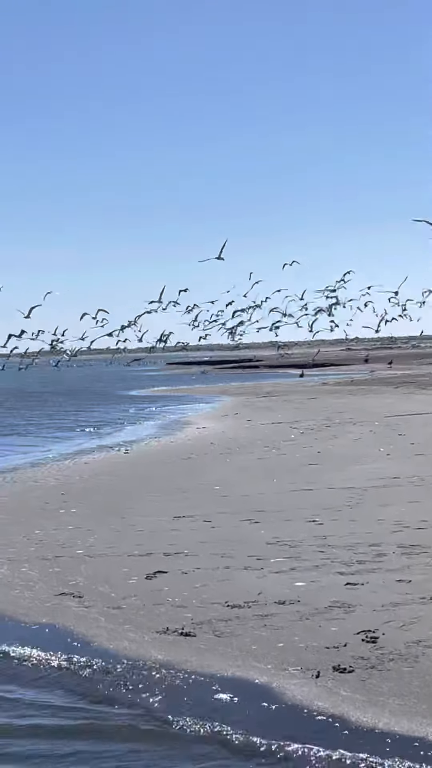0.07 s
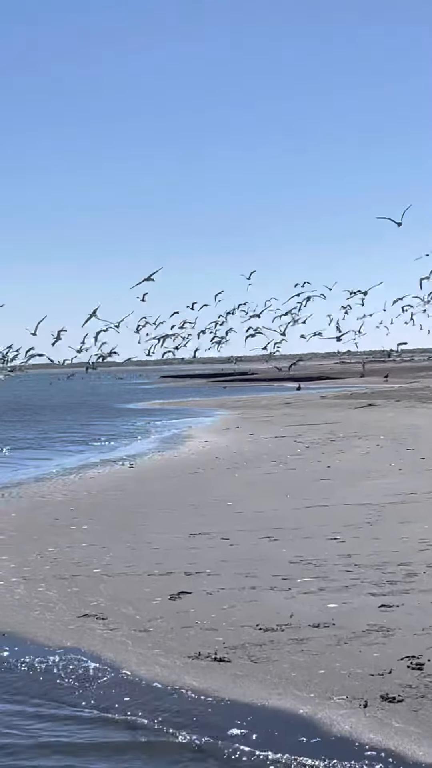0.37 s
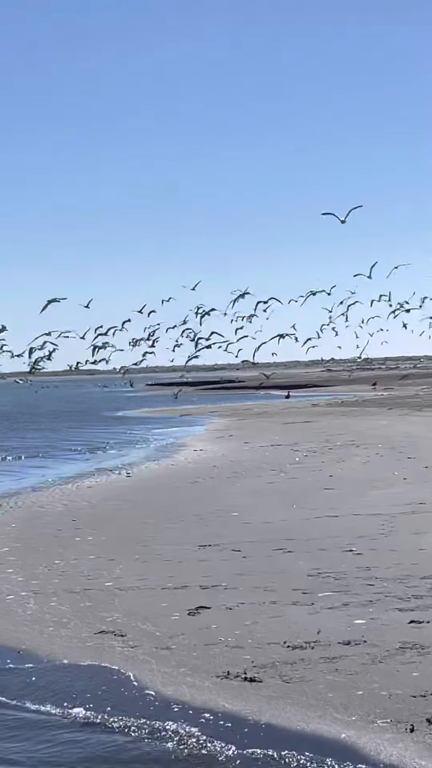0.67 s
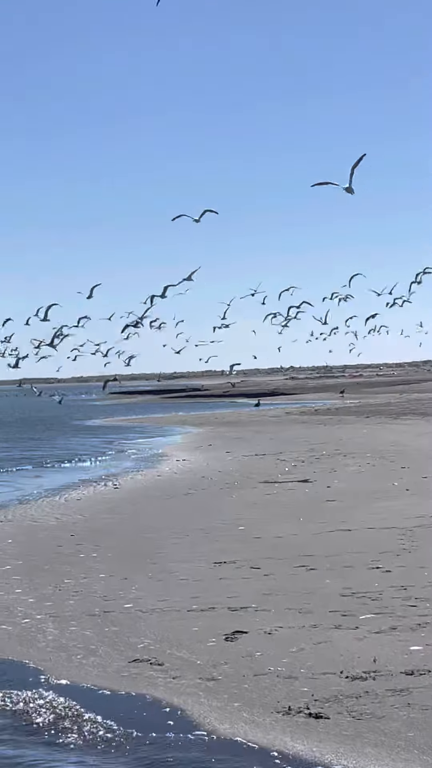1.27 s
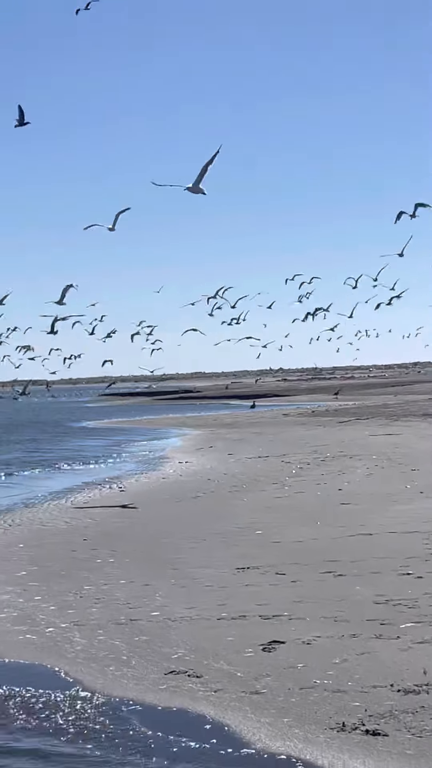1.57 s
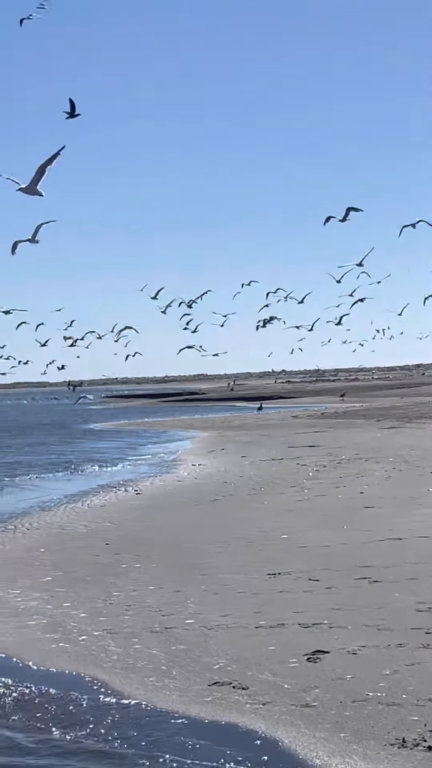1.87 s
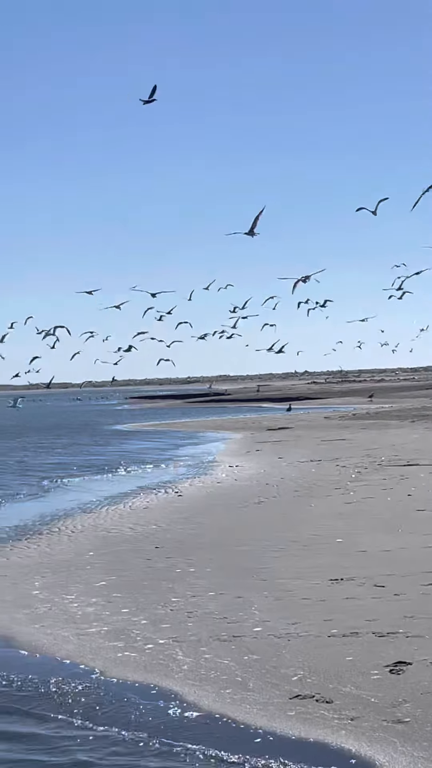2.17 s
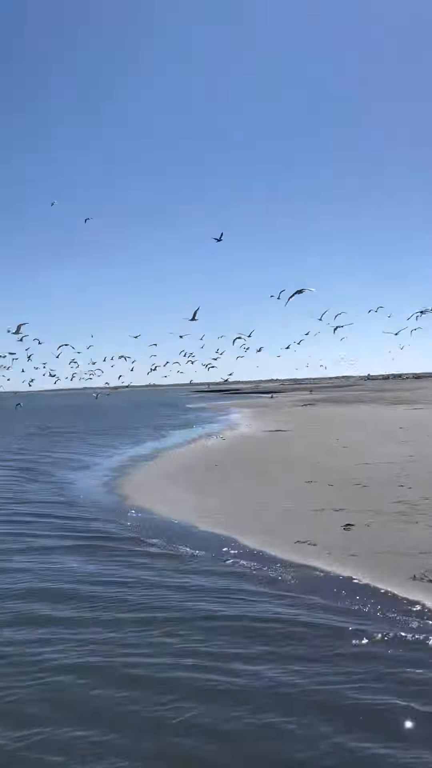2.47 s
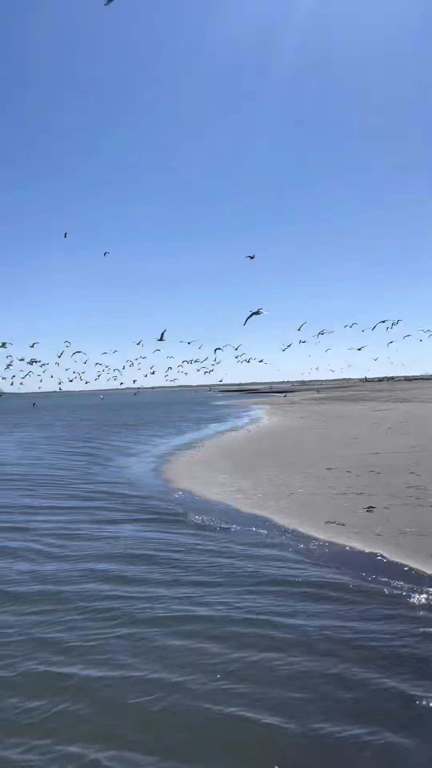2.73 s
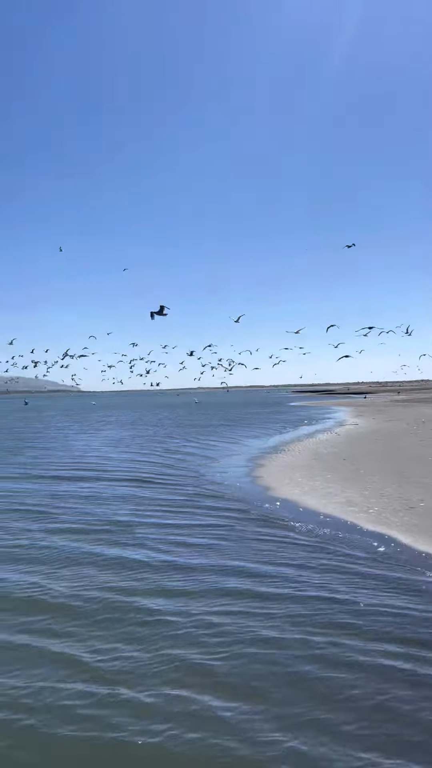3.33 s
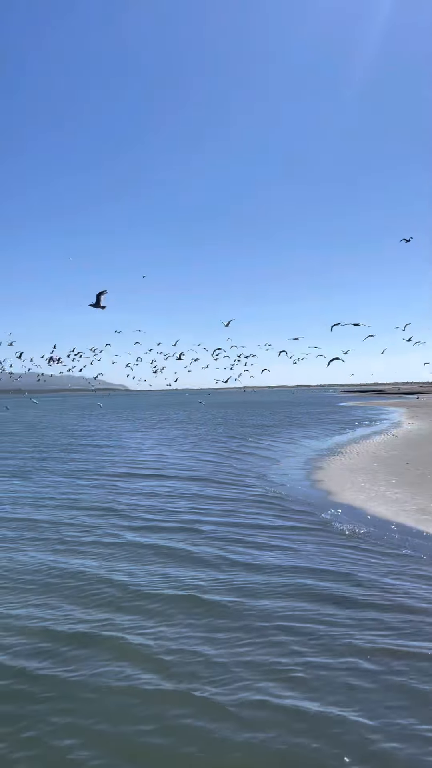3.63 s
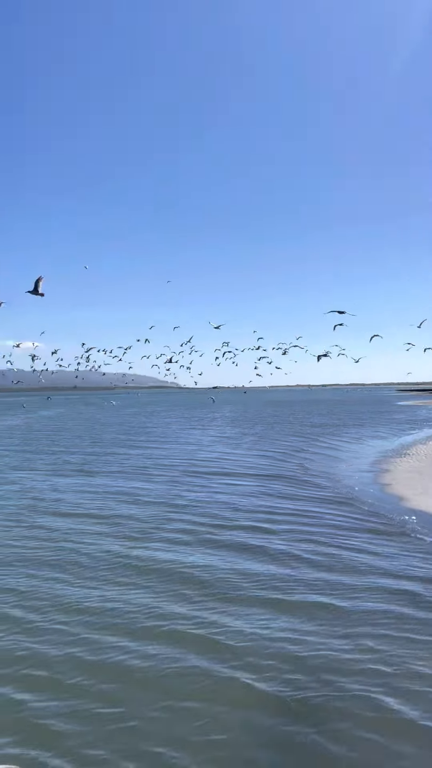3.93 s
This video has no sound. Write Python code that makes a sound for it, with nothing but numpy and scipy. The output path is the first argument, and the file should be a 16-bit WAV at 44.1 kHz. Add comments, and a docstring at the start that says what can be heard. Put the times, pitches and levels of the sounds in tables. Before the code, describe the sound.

Gulls calling, one nearby and a flock far off, with wind rumbling along the shore.

```python
"""Gusts of wind buffet the microphone on a sandy shore, while a large flock clamours far off over the
water and small waves wash the sand. A thin whistle arches; then one gull nearby sounds a low note and
gives four clear, falling cries, each with a rasp at its start and a creak at its end.
The voices are periodic vibrations with a gliding, unsteady pitch. Wind is the random pressure of
turbulent eddies, and the water is broadband noise with the ringing of small bubbles."""
import sys
import numpy as np
from scipy import signal
from scipy.fft import rfft, irfft
from scipy.io import wavfile
from scipy.ndimage import uniform_filter1d

SR = 44100
rng = np.random.default_rng(int(sys.argv[2]) if len(sys.argv) > 2 else 0)


def wav_out(sig):
    """Save sig, one row per channel (or a flat mono array), as 16-bit PCM at SR to the path in sys.argv[1]."""
    wavfile.write(sys.argv[1], SR, np.round(np.clip(np.atleast_2d(sig).T, -1, 1) * 32767).astype(np.int16))


N = 176400
T = np.arange(N) / SR


# Each row: start and length in seconds, opening and held pitch in Hz, settling and fall time in seconds,
# fundamental, octave, upper partials and rasp in dB, the overtones' left excess in dB and left lag
# in ms, scoop, sag of the fundamental and final yelp in dB, the overtones' early stop in seconds.
GULL_CRIES = [(2.008, 0.11, 1588, 1575, 0.021, 0.098, -51.5, -34, -84.5, -64, 0, -.04, -57, 3, -37.5, 0.025),
              (2.499, 0.19, 1577, 1442, 0.053, 0.051, -38.5, -43.5, -60.5, -39.5, -3, -0.04, -47, -4, -47, .02),
              (3.062, 0.22, 1550, 1464, .061, 0.078, -30.3, -35, -54.5, -46.5, 0.5, 0.034, -39, -3, -36, 0.0044),
              (3.751, 0.22, 1550, 1490, 0.033, 0.095, -41, -27.5, -51, -43.5, -6.5, .067, -42.5, -11, -41, 0.022)]
# Each row: multiple of the pitch, relative level in dB. Half multiples come from uneven cycles.
UPPER_PARTIALS = [(2.5, -14), (3, 0), (4, -11), (4.5, -28), (5, -25), (7, -25)]
def near_gull():
    """Periodic vibration gives a harmonic series; the pitch falls and overtones fade as the beak closes."""
    end_hz, attack_s, scoop_s = 1201, 0.014, 0.024
    voice, cracks = np.zeros((2, N)), np.zeros(N)
    rasp = throat_rasp() * undb(3 * drift(250))
    jitter, shimmer, flicker_db = 1 + 0.0038 * drift(160), undb(0.5 * drift(60)), 3.9 * drift(35)
    for (start, length, first_hz, held_hz, settle_s, fall_s, low_db, octave_db, upper_db, rasp_db,
         pan_db, lag_ms, scoop_db, sag_db, yelp_db, early_s) in GULL_CRIES:
        span = (T >= start) & (T < start + length)
        age = T[span] - start
        left_s = length - age
        closing = np.clip(1 - left_s / fall_s, 0, 1) ** 1.9
        hz = held_hz + (first_hz - held_hz) * np.exp(-(age / settle_s) ** 2)
        hz += (end_hz - held_hz) * closing
        hoarse = .035 * (np.exp(-age / .01) + closing ** 2)  # unsteady at both ends
        phase = phase_of(hz * (jitter[span] + hoarse * drift(600)[span]))
        stereo_phase = phase + np.pi * hz * lag_ms / 1000 * np.array([[-1], [1]])
        upper = sum(undb(db) * tone(k * stereo_phase) for k, db in UPPER_PARTIALS)
        upper *= undb(upper_db - 22 * closing + flicker_db[span])
        overtones = undb(octave_db) * tone(2 * stereo_phase) + upper
        overtones *= (1 - np.exp(-age / 0.015)) * gate(age, length - early_s, attack_s, 0.0089)
        overtones *= undb(-29.5 * closing + np.array([[pan_db], [-pan_db]]) / 2)
        held = undb(low_db + sag_db * np.clip((fall_s - left_s) / .05 + .5, 0, 1))
        yelp = undb(yelp_db) * np.exp(-((left_s - 0.013) / 0.027) ** 2)  # a last swell
        fundamental = np.hypot(held * (1 - closing), yelp) * undb([[-1.1], [1.1]]) * tone(phase)
        sputter = undb(3 * closing * drift(350)[span])
        envelope = gate(age, length, attack_s, 0.0062) * shimmer[span] * sputter
        voice[:, span] += (fundamental + overtones) * envelope
        voice += rasp * undb(rasp_db) * np.exp(-((T - start + 0.0044) / 0.02) ** 2)
        # An upward scoop leads into the cry and a creak follows it.
        add(cracks, start - scoop_s, undb(scoop_db) * cracked_voice(scoop_s, hz=1390, rise=.45))
        add(cracks, start + length, undb(-50) * cracked_voice(0.028, end_hz, rise=0))
    return voice + cracks


# Each row: frequency in Hz, gain of the throat in dB.
THROAT_RESPONSE = [(700, -27), (1150, -3), (1650, 1.5), (2050, 2), (2350, -7.5), (2700, 2), (3150, -15),
                   (3750, -5), (4800, -27.5), (5800, -21), (8000, -47)]
def throat_rasp(pulse_hz=535):
    """Source and filter: slow, uneven pulses of the voice excite the resonances of the throat."""
    cycles = np.floor(np.cumsum(pulse_hz * (1 + .075 * drift(pulse_hz))) / SR)
    return colour(np.diff(cycles, prepend=0), THROAT_RESPONSE)


def cracked_voice(length, hz, rise):
    """Random frequency modulation blurs the pitch of a short slide of the voice."""
    progress = np.linspace(0, 1, int(length * SR))
    jitter, shimmer = drift(700)[:len(progress)], drift(300)[:len(progress)]
    phase = phase_of(hz * (1 + rise * (progress - .5) + .06 * jitter))
    return tone(phase) * undb(3 * shimmer) * gate(progress, 1, 0.22, 0.18)


# Each entry: relative level of a harmonic in dB, from the fundamental up.
LOW_HARMONICS = [3, -19.5, -20.5, -26, -37]
def low_note(start=1.963, length=.056, hz=1356):
    """A harmonic series swells briefly in the gull's lower register."""
    phase = phase_of(hz * (1 + 0.0071 * drift(140)))
    voice = sum(undb(db) * tone(k * phase) for k, db in enumerate(LOW_HARMONICS, 1))
    return undb(-39) * voice * gate(T - start, length, 0.04, 0.013)


# Each row: time in seconds, pitch in Hz, level in dB.
WHISTLE_ARCH = [(1.70, 3250, -56), (1.72, 3830, -51.5), (1.745, 4150, -52.5), (1.796, 4440, -51.5),
                (1.836, 4160, -52), (1.852, 3900, -55.5), (1.868, 3260, -60)]
def whistle():
    """A nearly sinusoidal vibration: another bird's thin call glides up and down with a faint octave."""
    start, end = WHISTLE_ARCH[0][0], WHISTLE_ARCH[-1][0]
    phase = phase_of(curve(WHISTLE_ARCH) * (1 + 0.0051 * drift(330)))
    voice = tone(phase) + undb(-38.5) * tone(2 * phase)
    return voice * undb(curve(WHISTLE_ARCH, column=2)) * gate(T - start, end - start, 0.0092, 0.0082)


# Each row: start and length in seconds, pitch in Hz, rise as a share of the pitch, level in dB.
DISTANT_CRIES = [(0.605, .12, 1900, .083, -50.5), (0.621, .1, 2850, .04, -54.5),
                 (0.811, .11, 2140, 0.074, -51), (0.902, .1, 2155, -0.066, -53),
                 (1.06, .14, 1790, .048, -45), (1.08, .17, 2124, -0.013, -53),
                 (1.13, .12, 1865, -.05, -49.5), (1.333, .13, 2030, .03, -52.5),
                 (1.38, .11, 1834, -.13, -52), (1.666, .11, 2045, 0, -50.5), (1.71, .1, 1750, -0.15, -49.5),
                 (1.853, 0.059, 3120, -.095, -60), (2.33, .2, 1990, 0.07, -48.5),
                 (2.331, .16, 2675, .026, -54.5), (2.756, .14, 1770, 0, -51), (2.921, .15, 1790, 0, -53),
                 (2.93, .13, 1994, -.04, -57.5), (3.429, .084, 3650, 0.14, -59.5),
                 (3.502, .13, 1114, 0.09, -54), (3.661, .1, 2680, .047, -48.5)]
# Each row: time in seconds, level of the honking body in dB, level of the shrill edge in dB.
CLAMOUR_LEVELS = [(0, -52, -56), (.25, -58, -63.5), (.35, -52, -56.5), (.55, -51, -61), (.67, -46, -54.5),
                  (.78, -51, -54), (1.03, -48, -55), (1.15, -44.5, -49.5), (1.3, -49, -55.5),
                  (1.73, -45.5, -50), (1.92, -53.5, -58.5), (2.22, -62, -60), (2.38, -49.5, -51),
                  (2.48, -45, -44), (2.6, -53.5, -54), (2.74, -51.5, -60), (3.0, -53.5, -60.5),
                  (3.62, -58.5, -64.5), (3.74, -42.5, -48), (3.86, -53, -63), (3.96, -43.5, -44.5)]
# Each row of both spectra: frequency in Hz, relative level in dB.
BODY_SPECTRUM = [(500, -28), (850, 2.5), (1300, 0.5), (1800, 0), (2200, -4), (2600, -19), (3500, -37),
                 (6000, -58.5)]
EDGE_SPECTRUM = [(1500, -36.5), (2300, -8), (2700, -2), (3200, -0.5), (3700, -7.5), (4300, -21.5),
                 (4900, -35), (5600, -18), (6600, -34), (8500, -45.5)]
def flock():
    """Superposition: hundreds of cries merge in two registers, and a few louder ones stand out."""
    singles = np.zeros(N)
    for start, length, hz, rise, db in DISTANT_CRIES:
        add(singles, start, undb(db) * far_cry(length, hz, arch=.045, rise=rise))
    singles = signal.sosfilt(signal.butter(4, 4200, fs=SR, output="sos"), singles)
    body = clamour(BODY_SPECTRUM, centre_hz=1853, spread=.2) * undb(curve(CLAMOUR_LEVELS))
    edge = clamour(EDGE_SPECTRUM, centre_hz=2950, spread=.13) * undb(curve(CLAMOUR_LEVELS, column=2))
    return singles + body + edge


def clamour(spectrum, centre_hz, spread, count=300):
    """Incoherent addition: cries overlap around one pitch, and still farther ones blur into noise."""
    crowd = np.zeros(N)
    for when, duration, arch in rng.random(size=(count, 3)):
        pitch, db, rise = rng.standard_normal(3)
        cry = far_cry(.08 + .1 * duration, centre_hz * np.exp(spread * pitch), .1 * arch, 0.0698 * rise)
        add(crowd, when * N / SR, undb(db) * cry)
    blur = noise(spectrum) * undb(2 * drift(25))
    return stereo(unit(colour(crowd, spectrum) + blur), undb(-9) * noise(spectrum))


def far_cry(length, hz, arch, rise):
    """Joint random modulation of pitch and level makes an arching cry hoarse."""
    progress = np.linspace(0, 1, int(length * SR))
    rough = np.interp(progress, np.linspace(0, 1, 100), rng.standard_normal(100))
    phase = phase_of(hz * (1 - arch * (2 * progress - 1) ** 2 + rise * (progress - .5) + .018 * rough))
    voice = tone(phase) + undb(-18.5) * tone(2 * phase)
    return voice * np.sin(np.pi * progress) * undb(3.5 * rough)


# Each row: time in seconds, steady level of the rumble in dB and of the flutter in dB.
WIND_PUSH = [(0, -39, -51.5), (.15, -39, -51), (.27, -34, -58), (.43, -35, -59.5), (.62, -24, -52.5),
             (.8, -37, -60.5), (1.05, -29.5, -59), (1.5, -31, -62), (1.56, -27.5, -51.5), (1.8, -26.5, -47),
             (2.4, -29.5, -44.5), (2.85, -25.5, -48), (3.3, -26, -44), (3.6, -18, -42.5), (3.8, -17, -41),
             (3.93, -25.5, -43)]
# Each row: time of the peak and half length in seconds, level in dB.
GUST_PEAKS = [(0.214, 0.024, -18.5), (0.329, 0.011, -24.5), (0.508, 0.016, -12.5), (0.601, 0.045, -18),
              (1.422, 0.012, -19.5), (1.598, 0.013, -22), (1.927, .0085, -6.5), (2.176, 0.01, -22),
              (2.278, .01, -20), (2.357, 0.0065, -11.5), (2.426, 0.018, -13.5), (2.662, 0.013, -19.5),
              (2.71, 0.0091, -18), (2.996, 0.0065, -17.5), (3.204, 0.011, -17.5), (3.342, .006, -17.5),
              (3.432, 0.0088, -16), (3.507, .016, -13), (3.576, 0.012, -8), (3.649, 0.011, -7.5),
              (3.719, 0.0098, -9.5), (3.996, 0.0069, -6)]
# Each row of both spectra: frequency in Hz, relative level in dB.
EDDY_SPECTRUM = [(15, -32), (30, -17.5), (55, 2.5), (85, -2), (135, -3), (170, -8.5), (220, -18),
                 (320, -26.5), (600, -48.5), (1200, -74.5)]
FLUTTER_SPECTRUM = [(120, -14.5), (260, 4.5), (450, 1.5), (700, -10.5), (1100, -20), (2000, -32),
                    (4000, -63.5)]
def wind():
    """Turbulent pressure: eddies thump the microphone and flutter higher up; gusts drive both."""
    buffet = undb(3.5 * drift(27.98))
    gusts = sum(undb(db) * bell(when, half_s) for when, half_s, db in GUST_PEAKS)
    eddies = noise(EDDY_SPECTRUM)
    eddies /= np.sqrt(uniform_filter1d(eddies ** 2, int(0.033 * SR)) + 0.089)  # evens out the level
    eddies = colour(eddies, [(300, -1.5), (1200, -23.5)])
    rumble = eddies * np.hypot(undb(curve(WIND_PUSH)) * buffet, gusts)
    flutter = stereo(noise(FLUTTER_SPECTRUM), undb(-13) * noise(FLUTTER_SPECTRUM)) * undb(4 * drift(90))
    return rumble + flutter * np.hypot(undb(curve(WIND_PUSH, column=2)), undb(-30) * gusts)


# Each row: time of the peak in seconds, level in dB.
FLAP_PEAKS = [(.517, -31), (1.835, -35.5), (2.172, -34.5), (2.393, -31.5), (3.35, -45), (3.579, -29),
              (3.628, -33.5), (3.68, -36), (3.762, -30), (3.889, -36), (3.984, -30.5)]
# Each row: frequency in Hz, relative level in dB.
FLAP_SPECTRUM = [(150, -16.5), (280, -2.5), (430, 1.5), (650, -9), (950, -16), (1500, -32), (6000, -87)]
def wind_flaps():
    """Small, fast eddies make brief pressure pulses that give the buffets a hollow bark."""
    return noise(FLAP_SPECTRUM) * sum(undb(db) * bell(when, half_s=0.009) for when, db in FLAP_PEAKS)


# Each row: time in seconds, level in dB.
SWIRL_STRENGTH = [(.15, -74), (.3, -33), (.45, -35.5), (.52, -24.5), (1.1, -35.5), (1.9, -24), (2.4, -25),
                  (2.9, -36), (3.1, -29), (3.98, -27.5)]
# Each row: frequency in Hz, relative level in dB.
SWIRL_SPECTRUM = [(20, -23.5), (60, 0.5), (150, 3), (300, -13.5), (1000, -25.5), (1500, -48), (5000, -72)]
def wind_swirl():
    """Turbulence sets up a pressure difference between left and right."""
    return stereo(0, noise(SWIRL_SPECTRUM) * undb(curve(SWIRL_STRENGTH) + 2 * drift(30)))


# Each row: frequency in Hz, relative level in dB.
WASH_SPECTRUM = [(60, -2), (150, 3), (400, -12.5), (850, 2), (1300, -5.5), (4500, -24.5), (8000, -53.5),
                 (11500, -27.5)]
def wavelets(bubble_hz=907, decay_cycles=5.9):
    """Water washes over sand as broadband noise and sheds bubbles, damped resonators of rising pitch."""
    wash = stereo(noise(WASH_SPECTRUM), undb(-1.5) * noise(WASH_SPECTRUM)) * undb(-59 + 1.6 * drift(2.7))
    bubbles, age = np.zeros((2, N)), T[:SR // 20]
    for k, (when, pitch, faintness) in enumerate(rng.random(size=(240, 3))):
        hz = bubble_hz * 2 ** (2 * pitch - 1)
        ring = np.sin(phase_of(hz * (1 + 6 * age))) * np.exp(-age * hz / decay_cycles)
        add(bubbles[k % 2], when * N / SR, undb(-18 * faintness) * ring)
    return wash + undb(-58.5) * unit(bubbles)


# Each row: start in seconds, level in dB.
SLAPS = [(.734, -37), (3.502, -30.5)]
# Each row: frequency in Hz, relative level in dB.
SLAP_SPECTRUM = [(250, -25.5), (600, 8.5), (950, 3), (1500, -14.5), (6000, -64.5)]
def splashes(decay_s=0.013):
    """Impact noise: the slap of a wavelet rises quickly and decays exponentially."""
    envelope = sum(undb(db) * gate(T - start, .1, 0.0037, 0.017) * np.exp(-abs(T - start) / decay_s)
                   for start, db in SLAPS)
    return noise(SLAP_SPECTRUM) * envelope


def undb(db):
    """Decibels to gain."""
    return 10 ** (np.asarray(db) / 20)


def unit(x):
    """Scale to rms 1."""
    return x / np.sqrt(np.mean(x ** 2))


def curve(rows, column=1):
    """Linear interpolation of one column of a table in time."""
    rows = np.array(rows)
    return np.interp(T, rows[:, 0], rows[:, column])


def colour(x, spectrum):
    """Filter by a (Hz, dB) spectrum; rms 1."""
    hz, db = np.array(spectrum).T
    gain = undb(np.interp(np.log(np.fft.rfftfreq(N, 1 / SR) + 1), np.log(hz), db))
    return unit(irfft(rfft(x) * gain, N))


def noise(spectrum):
    """Gaussian noise with a given spectrum."""
    return colour(rng.standard_normal(N), spectrum)


def drift(rate_hz):
    """Smoothed random steps; rms 1."""
    hold = max(int(SR / rate_hz), 1)
    steps = np.repeat(rng.standard_normal(N // hold + 1), hold)
    return unit(uniform_filter1d(uniform_filter1d(steps, hold), hold)[:N])


def stereo(mid, side):
    """Left and right as sum and difference."""
    return np.array([mid + side, mid - side])


def gate(age, length, attack, release):
    """Envelope with a smooth attack, hold and release."""
    rise = np.sin(np.pi / 2 * np.clip(age / attack, 0, 1))
    return rise * np.sin(np.pi / 2 * np.clip((length - age) / release, 0, 1))


def bell(when, half_s):
    """Gaussian envelope with peak 1."""
    return np.exp(-((T - when) / half_s) ** 2 / 2)


def phase_of(hz):
    """Phase is the time integral of frequency."""
    return 2 * np.pi * np.cumsum(hz) / SR


def tone(phase):
    """Sine of rms 1."""
    return np.sqrt(2) * np.sin(phase)


def add(out, start, x):
    """Superpose a sound at a time in seconds."""
    i = int(np.clip(start * SR, 0, N - 1))
    out[i:i + len(x)] += x[:N - i]


def scene():
    """The pressures of birds, water and wind add linearly in the open air."""
    birds = near_gull() + low_note() + whistle() + flock()
    return birds + wavelets() + splashes() + wind() + wind_flaps() + wind_swirl()


# Each row: time in seconds, frequency in Hz below which the sound narrows to the centre.
SIDE_CUTOFF = [(.95, 30), (1.1, 230), (1.6, 370), (2.1, 633), (3.1, 793)]
def record(dry, top_hz=12200):
    """Mid-side filtering: a rising high-pass on the side centres the bass; a low-pass cuts the top."""
    frames = dict(fs=SR, nperseg=2048, noverlap=1536)
    hz, times, side = signal.stft((dry[0] - dry[1]) / 2, **frames)
    cutoff_hz = np.interp(times, *np.array(SIDE_CUTOFF).T)
    high_pass = 1 / np.sqrt(1 + (cutoff_hz / (hz[:, None] + 1)) ** 16)
    side = signal.istft(side * high_pass, **frames)[1][:N]
    low_pass = signal.ellip(8, .2, 70, top_hz, fs=SR, output="sos")
    return signal.sosfilt(low_pass, stereo(dry.mean(axis=0), side))


dry = scene()
out = record(dry)
wav_out(out)
```